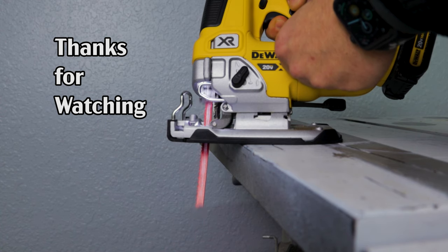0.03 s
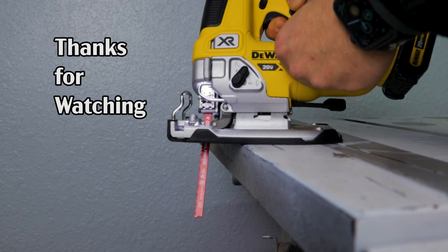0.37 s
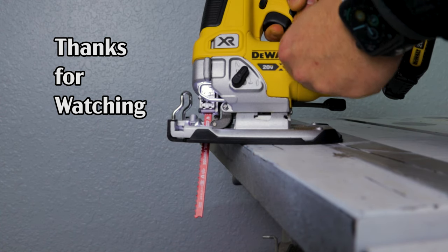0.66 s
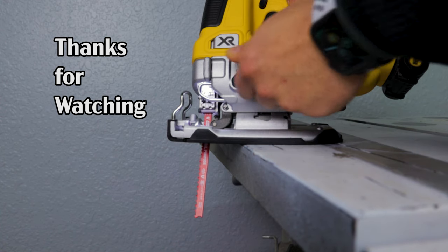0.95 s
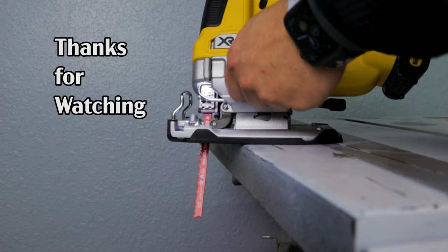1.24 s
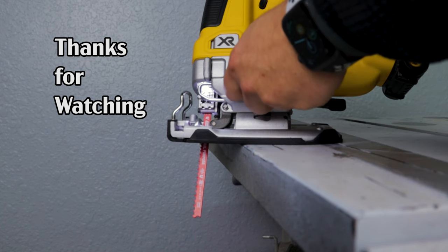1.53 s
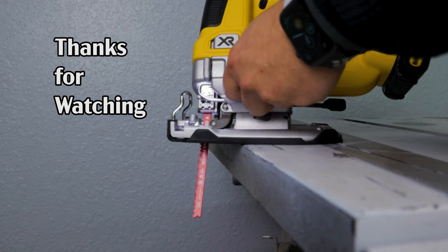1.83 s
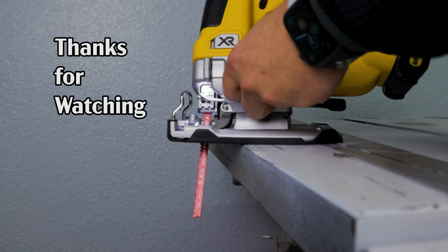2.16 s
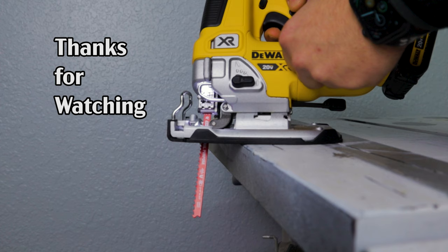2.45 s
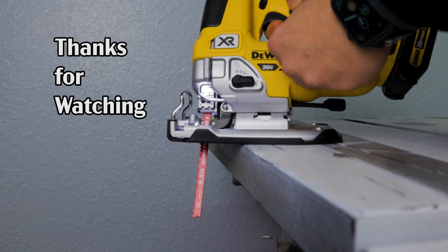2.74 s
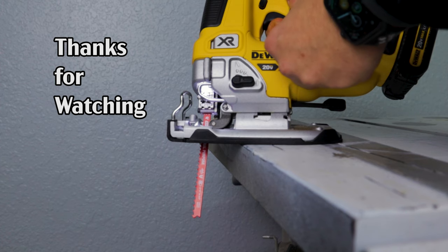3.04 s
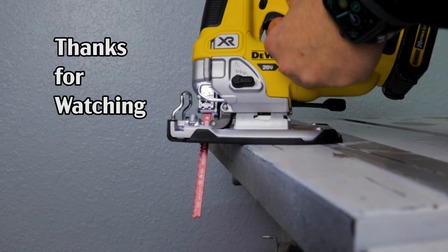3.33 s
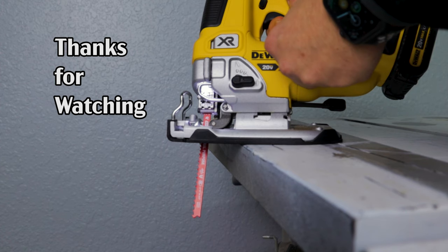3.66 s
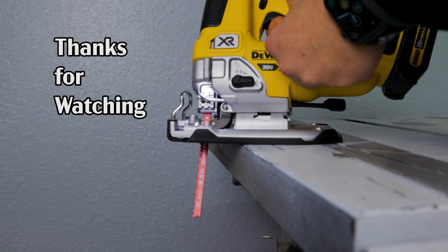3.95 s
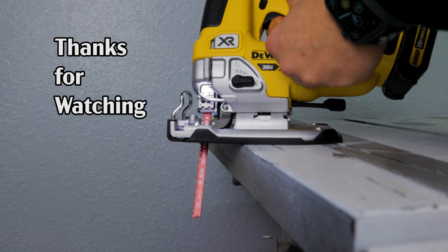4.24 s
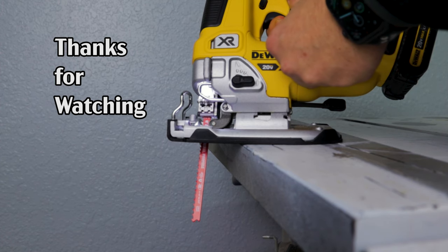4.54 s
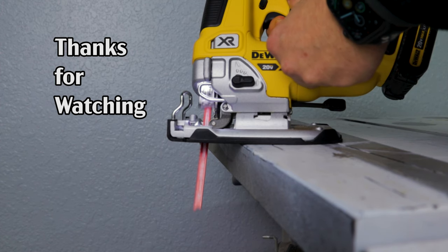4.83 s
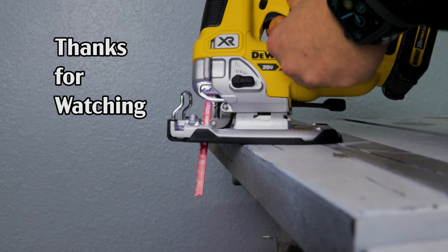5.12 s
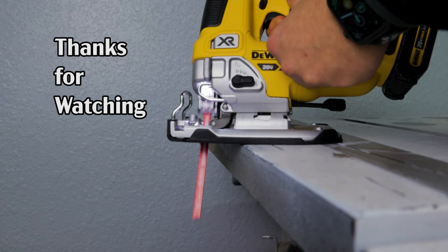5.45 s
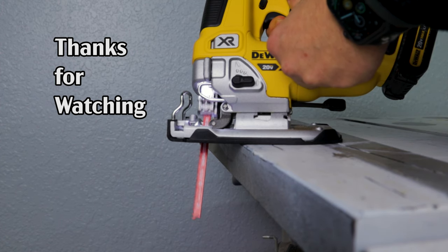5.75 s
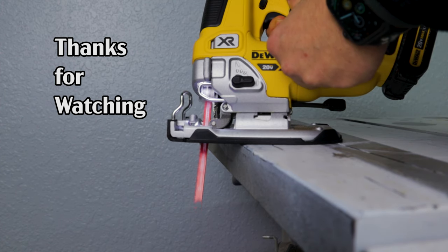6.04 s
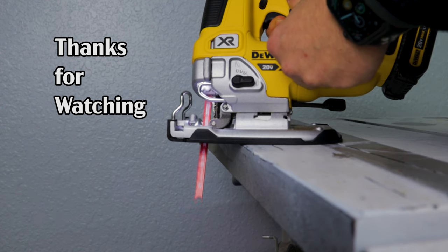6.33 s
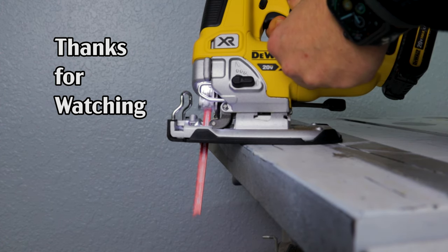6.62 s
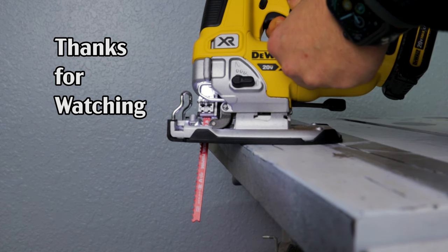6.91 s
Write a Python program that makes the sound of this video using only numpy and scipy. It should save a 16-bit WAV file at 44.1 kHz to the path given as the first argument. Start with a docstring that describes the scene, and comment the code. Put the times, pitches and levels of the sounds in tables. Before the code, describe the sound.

In a small room, close by and a little to the right, a jigsaw idles for a moment with a pulsing gear whine and metallic clacks, then stops. Over a low ventilation hum, a hand taps the plastic grip, snaps a lever into its notch and lightly clicks the trigger. The saw starts again at the same slow pace, its blade moving freely through the air, and finally brakes with a clunk.

```python
"""A cordless jigsaw idles slowly with its blade in the air, in a small room, a little to the right.
Its gears whirr and sag in speed on every stroke, and the blade shaft clacks at each end of its travel.
It brakes with a clunk, a hand flips the lever on its side and takes the grip again, the trigger
clicks and squeals faintly, and the saw runs once more and stops. Ventilation rumbles softly behind it."""
import sys
import numpy as np
from scipy import signal
from scipy.fft import rfft, irfft, next_fast_len
from scipy.io import wavfile

SR = 44100
rng = np.random.default_rng(int(sys.argv[2]) if len(sys.argv) > 2 else 0)


def waveform_to_disk(signal):
    """Save audio, clipped to [-1, 1], as 16-bit WAV at the path in sys.argv[1]."""
    frames = np.transpose(np.atleast_2d(signal))
    scaled = np.clip(frames, -1, 1) * 32767
    samples = np.round(scaled).astype(np.int16)
    wavfile.write(sys.argv[1], SR, samples)


N = 316726
TIME = np.arange(N) / SR
BINS = np.fft.rfftfreq(8192, 1 / SR)  # the frequencies in Hz at which filters are drawn


def gain_of(db):
    """Turns decibels into a factor to multiply by."""
    return 10 ** (np.asarray(db) / 20)

def evened(x):
    """Scales a signal to an average power of one."""
    return x / np.sqrt(np.mean(x ** 2) + 1e-20)

def read(points, hz, column=1):
    """Reads between the rows of a table, with frequency spaced in octaves."""
    points = np.asarray(points, float)
    return np.interp(np.log(hz + 1), np.log(points[:, 0] + 1), points[:, column])

def peaks_db(resonances, hz=BINS):
    """A curve in dB with a bump or dip for each resonance of a part."""
    return sum(db / (1 + (2 * (hz - centre) / width) ** 2) for centre, width, db in resonances)

def add(mix, start, sound):
    """Mixes a sound in at a start time in seconds."""
    part = mix[max(round(start * SR), 0):][:len(sound)]
    part += sound[:len(part)]

def colour(x, db):
    """Filters a sound so that it rings after each hit; only the shape of the dB curve counts."""
    log_gain = np.log(gain_of(np.r_[db, db[-2:0:-1]]))
    taps = np.fft.ifft(np.exp(np.conj(signal.hilbert(log_gain)))).real[:len(db)]
    return signal.oaconvolve(np.atleast_2d(x), taps[None] / np.linalg.norm(taps), axes=1)[:, :N]

def wander(rate_hz):
    """A smooth random wobble, about one in size."""
    coarse = TIME[::32]
    hz = np.fft.rfftfreq(len(coarse), coarse[1])
    slow = rfft(rng.standard_normal(len(coarse))) / (1 + (hz / rate_hz) ** 4)
    return np.interp(TIME, coarse, evened(irfft(slow, len(coarse))))

def burst(decay_s):
    """A brief chatter of contacts, equally strong from bass to treble."""
    t = TIME[:SR // 10]
    x = rng.standard_normal(len(t)) * (np.exp(-t / decay_s) - np.exp(-4 * t / decay_s))
    for _ in range(3):
        flat = irfft(np.exp(1j * np.angle(rfft(x))), len(t))
        x = flat * np.exp(-(t / (4 * decay_s)) ** 4)
    return x / np.linalg.norm(x)

def noise_pair(likeness):
    """Left and right white noise, as alike as a table says (1 the same, 0 unrelated, -1 opposite)."""
    left, other = rfft(rng.standard_normal((2, N)))
    alike = np.clip(read(likeness, np.fft.rfftfreq(N, 1 / SR)), -1, 1)
    return irfft(np.array([left, alike * left + np.sqrt(1 - alike ** 2) * other]), N)


# Trigger pulls. Each row: on and off in seconds, braking time in seconds, gear tone boost in dB.
RUNS = [(-1, .443, .058, -2), (4.62, 7.04, .04, 0)]
EFFORT_POWER = 1.4  # loudness follows the motor's speed raised to this power
def motor_speed(spin_up_s=.008):
    """Speed from 0 to 1: it leaps up with the trigger, holds, and dies away under the brake."""
    return sum(np.clip((TIME - on) / spin_up_s, 0, 1) * np.exp(-np.maximum(TIME - off, 0) / brake)
               for on, off, brake, _ in RUNS)

# The crank in each run. Each row: a time when the shaft is lowest, length of a turn, both in seconds.
CRANK_TURNS = [(.1265, .238), (4.7952, .2368)]
def crank_angle():
    """The crank turns evenly; its angle is zero when the shaft is lowest."""
    angle = np.zeros(N)
    for (on, *_), (lowest, turn) in zip(RUNS, CRANK_TURNS):
        angle = np.where(TIME >= on, 2 * np.pi * (TIME - lowest) / turn, angle)
    return angle

# Gear tones. Each row: multiple of the tooth rate, level in dB, swell in dB, loudest point of the turn.
GEAR_TONES = [(2, -55, 5, .56), (3, -54, 4, .95), (4, -52, 12.5, .27), (5, -58, 6, .65), (6, -55, 4, .1),
              (7, -56, 7, .72), (8, -56, 7.5, .73), (9, -62.5, 3, .3), (10, -67, 6, .25)]
# The housing's resonances. Each row: frequency in Hz, width in Hz, boost or cut in dB.
HOUSING = [(344, 17, 11.5), (436, 18, 4), (528, 40, 5), (851, 30, 7), (1008, 47, 6), (1111, 40, 3),
           (1243, 82, -4.5), (1450, 70, 4), (2030, 30, -3), (2095, 60, 4), (2490, 70, 6), (3560, 450, 6),
           (3690, 140, 5.5), (4080, 220, -4), (4490, 110, 4), (4740, 110, 3), (7570, 480, 7.5),
           (11040, 340, 5.5)]
def gear_whine(teeth, tooth_hz, angle, flutter_db=1.2, focus=1.8):
    """Meshing teeth sing; each tone swells once a turn and whenever it crosses a resonance."""
    whine, housing_db = np.zeros(N), peaks_db(HOUSING)
    for multiple, db, swell_db, loudest in GEAR_TONES:
        swell = np.exp(focus * (np.cos(angle - 2 * np.pi * loudest) - 1))
        level_db = db + swell_db * swell + np.interp(multiple * tooth_hz, BINS, housing_db)
        level_db += flutter_db * wander(51)
        whine += gain_of(level_db) * np.sin(2 * np.pi * (multiple * teeth + rng.random()))
    return whine * gain_of(sum(db * (TIME >= on) * (TIME < off + 1) for on, off, _, db in RUNS))

# The motor's fine whine. Each row: multiple of its turning rate, level in dB.
MOTOR_TONES = [(10, -61), (15, -59), (19, -65), (24, -72), (26, -61.5), (28, -61.5), (30, -63), (31, -60.5),
               (32, -57), (33, -63), (35, -68), (38, -66), (42, -66)]
def motor_whine(teeth, tooth_hz, turns_per_tooth=.4566, flutter_db=2, boost_db=.4):
    """The motor's close-set tones sway with each stroke and grow as they cross a resonance."""
    whine, housing_db = np.zeros(N), peaks_db(HOUSING)
    for harmonic in range(10, 43):
        multiple = harmonic * turns_per_tooth
        level_db = np.interp(harmonic, *np.transpose(MOTOR_TONES)) + boost_db
        level_db += np.interp(multiple * tooth_hz, BINS, housing_db) + flutter_db * wander(25)
        whine += gain_of(level_db) * np.sin(2 * np.pi * (multiple * teeth + rng.random()))
    return whine

# The gearbox's tone colour. Each row: frequency in Hz, level in dB.
GEARBOX_COLOUR = [(20, -50), (60, -31), (150, -10.5), (270, -7.5), (360, -7), (520, -0.5), (660, .5),
                  (1000, 0), (1300, -4.5), (1800, -0.5), (2900, -13.3), (4800, -12), (6200, -19.5),
                  (8000, -21), (11500, -32), (13500, -48), (16000, -57)]
# The saw's noise in stereo. Each row: frequency in Hz, how alike left and right are.
SAW_LIKENESS = [(300, 1), (1000, 0.86), (2000, .75), (4000, 0.49), (12000, .55)]
def gear_grind(teeth, speed, ease, rattle=.28, scatter_db=2, ease_db=-.02, dull_hz=1500):
    """Every tooth lands with its own force and scrapes for a moment."""
    force = gain_of(scatter_db * np.clip(rng.standard_normal(N), -2, 2))[teeth.astype(int)]
    scrape = rattle * evened(force * np.exp(-(teeth % 1) / .25)) + (1 - rattle)
    level = evened(scrape) * speed ** EFFORT_POWER * gain_of(ease_db * ease)
    grind = colour(level * noise_pair(SAW_LIKENESS), read(GEARBOX_COLOUR, BINS) + peaks_db(HOUSING))
    dull = signal.lfilter(*signal.butter(1, dull_hz, fs=SR), grind)
    return dull + speed * (grind - dull)  # slower teeth land more softly and lose their treble

# The sliding shaft's tone colour. Each row: frequency in Hz, level in dB.
SLIDE_COLOUR = [(5000, -32), (8500, -9), (11000, 7), (13000, -15), (16000, -40)]
def shaft_hiss(angle):
    """The shaft hisses in its guide where it moves fastest."""
    return colour(noise_pair(SAW_LIKENESS), read(SLIDE_COLOUR, BINS)) * np.abs(np.sin(angle + .15)) ** 4

def whirr(mesh_hz=270, sag=.057, lag_rad=.11, lift_sag=.018, waver=.002, grind_db=-40.3, hiss_db=-62):
    """Gears, motor and shaft together: they slow in mid-stroke, most of all while lifting the shaft."""
    speed, angle = motor_speed(), crank_angle()
    ease = np.cos(2 * (angle - lag_rad))  # high at the ends of a stroke, low in the middle
    tooth_hz = mesh_hz * speed * (1 + sag * ease - lift_sag * np.sin(angle) + waver * wander(25))
    teeth = np.cumsum(tooth_hz) / SR  # how many teeth have met so far
    whine = gear_whine(teeth, tooth_hz, angle) + speed * motor_whine(teeth, tooth_hz)
    grind = gain_of(grind_db) * gear_grind(teeth, speed, ease)
    hiss = gain_of(hiss_db) * speed * shaft_hiss(angle)
    return speed ** EFFORT_POWER * (whine + hiss) + grind

# The loaded crank pin's tone colour. Each row: frequency in Hz, level in dB.
CHUG_COLOUR = [(20, -65), (100, -39), (300, -18.5), (430, -3), (540, 1.5), (720, -4.5), (1000, -15),
               (3000, -51)]
def chug(level_db=-41.8, lag_rad=.41):
    """Just after the shaft turns round, the crank pin takes up the load and the housing throbs."""
    load = gain_of(level_db) * motor_speed() ** EFFORT_POWER * np.abs(np.cos(crank_angle() - lag_rad)) ** 10
    return colour(noise_pair(SAW_LIKENESS) * load, read(CHUG_COLOUR, BINS) + peaks_db(HOUSING))

# The shaft turns round. Each row: start in seconds, clink level in dB, knock level in dB.
STROKES = [(0.0084, -28, -33), (0.1271, -23.5, -29), (0.2468, -28, -35), (0.3641, -22, -34),
           (4.6783, -30, -34), (4.795, -23, -30), (4.9152, -24, -31), (5.032, -22, -28), (5.1522, -26, -33),
           (5.2689, -22, -31), (5.3892, -26, -36), (5.5059, -21, -28), (5.6261, -29, -33),
           (5.7428, -21, -32), (5.8631, -29, -35), (5.9798, -22, -32), (6.0995, -26, -33),
           (6.2163, -24, -29), (6.3365, -26, -33), (6.4532, -23, -31), (6.573, -28, -34),
           (6.6897, -24, -30), (6.8099, -26, -32), (6.9267, -24, -30)]
# The shaft's ring. Each row: pitch in Hz, seconds to fade 60 dB, dB at the upper end, dB at the lower.
SHAFT_RING = [(344, .4, -25, -22), (436, .28, -22, -12), (490, .18, -22, -10), (535, .16, -4, -11.5),
              (706, .12, -18, -10), (1440, .07, -13.5, -12.5), (1670, .045, 2.5, -6), (1760, .07, -22, -5)]
# The blade clamp's resonances. Each row: frequency and width in Hz, dB at the upper end, dB at the lower.
CLAMP = [(4700, 560, 8.5, -2), (5500, 450, -3, .5), (6400, 550, -2.5, 5), (7350, 600, 5, 3)]
# Tone colours of the knock and the clink. Each row: frequency in Hz, level in dB.
KNOCK_COLOUR = [(20, -60), (60, -43), (250, -19), (450, -13), (730, 3.5), (1200, -3.5), (1800, 2.5),
                (2800, -10.5), (4500, -17), (8000, -24), (16000, -48)]
CLINK_COLOUR = [(1500, -15.5), (3500, -13.5), (4700, -3), (6300, -1.5), (8000, -4.5), (9500, -8),
                (11500, -7), (14000, -23), (16000, -37)]
def clacks(knock_db=21, ring_db=-1, clink_db=(15, 13.3), knock_lead_s=.0009, clink_lag_s=.0011,
           chatter=.72, build_cycles=2.5):
    """At each end of a stroke the shaft's loose link knocks, the shaft rings and the clamp clinks."""
    knocks, rings, clinks = np.zeros(N), np.zeros(N), np.zeros((2, 2, N))
    t, is_low = TIME[:SR // 5], np.cos(crank_angle()) > 0
    for start, high_db, low_db in STROKES:
        end = int(is_low[round(start * SR)])  # 0 for the upper end, 1 for the lower
        blow = chatter * burst(decay_s=.003)
        blow[0] += 1 - chatter  # one firm contact, then chatter
        add(knocks, start - knock_lead_s, gain_of(low_db + knock_db) * blow / np.linalg.norm(blow))
        for side in clinks[end]:  # the clamp scatters its treble differently to each side
            add(side, start + clink_lag_s, gain_of(high_db + clink_db[end]) * burst(decay_s=.0013))
        for hz, fade_s, *ends_db in SHAFT_RING:
            fade = gain_of(low_db + ring_db + ends_db[end] - 60 * t / fade_s)
            rise = 1 - np.exp(-t * hz / build_cycles)
            add(rings, start, rise * fade * np.sin(2 * np.pi * hz * rng.uniform(.98, 1.01) * t))
    out = colour(knocks, read(KNOCK_COLOUR, BINS) + peaks_db(HOUSING)) + rings
    for end, clink in enumerate(clinks):
        clamp = [(hz, width, ends_db[end]) for hz, width, *ends_db in CLAMP]
        out = out + colour(clink, read(CLINK_COLOUR, BINS) + peaks_db(clamp))
    return out

# The background's tone colour, then its faint whine. Each row: frequency in Hz, level in dB.
RUMBLE_COLOUR = [(20, -18), (45, -19.5), (75, -8.5), (113, -13.5), (190, -14.5), (330, -19), (740, -22),
                 (1000, -26), (2300, -29.5), (3300, -34), (6000, -42), (11500, -48.5), (12800, -58.5),
                 (16000, -73)]
ROOM_WHINE = [(2700, -93), (3270, -97)]
# The background in stereo. Each row: frequency in Hz, how alike left and right are.
RUMBLE_LIKENESS = [(60, 1), (180, .75), (550, -0.47), (1650, -0.44), (5000, -0.58), (15000, -0.73)]
def room_tone(level_db=-59, drone_hz=87, drone_width_hz=14, drone_db=6.5, waver=.004):
    """Low ventilation rumble with a soft drone, under a thin hiss and a faint steady whine."""
    hz = np.fft.rfftfreq(N, 1 / SR)
    shape = gain_of(read(RUMBLE_COLOUR, hz) + peaks_db([(drone_hz, drone_width_hz, drone_db)], hz))
    whine = np.zeros(N)
    for pitch, db in ROOM_WHINE:
        cycles = np.cumsum(pitch * (1 + waver * wander(15))) / SR
        whine += gain_of(db) * np.sqrt(2) * np.sin(2 * np.pi * cycles)
    return gain_of(level_db) * evened(irfft(rfft(noise_pair(RUMBLE_LIKENESS)) * shape, N)) + whine

# The coasting fan's tone colour. Each row: frequency in Hz, level in dB.
FAN_COLOUR = [(800, -12), (1700, 0), (3300, -7), (6000, -12), (9000, -18), (11800, -17), (13500, -32)]
def coasting_fan(level_db=-63, fade_s=.23):
    """After the trigger is let go, the air through the cooling fan dies away as a thin hiss."""
    fade = sum((TIME > off) * np.exp(-np.maximum(TIME - off, 0) / fade_s) for _, off, *_ in RUNS)
    return gain_of(level_db) * fade * colour(noise_pair(SAW_LIKENESS), read(FAN_COLOUR, BINS))

# The four bands of a click. Each row: lower edge in Hz, upper edge in Hz, fade time in seconds.
CLICK_BANDS = [(377, 880, 0.013), (900, 2580, 0.005), (2710, 8450, 0.0012), (8300, 12300, 0.00041)]
def clicks(events, part, bands_db, stretch, boost_db=23):
    """Short blows ring the struck part; low bands last longest, and stretch scales every fade time."""
    out = np.zeros(N)
    for start, db, bright_db in events:
        for k, (low_hz, high_hz, decay_s) in enumerate(CLICK_BANDS):
            band_filter = signal.butter(3, [low_hz, high_hz], "band", fs=SR, output="sos")
            band = colour(signal.sosfilt(band_filter, burst(decay_s * stretch)), peaks_db(part))[0]
            level_db = boost_db + db + bands_db[k] + bright_db * (k - 1)
            add(out, start, gain_of(level_db) * band / np.linalg.norm(band))
    return out

# Braking clunks. Each row: start in seconds, level in dB, brightness in dB per band.
CLUNKS = [(.4485, -34.5, 2), (.570, -40, -5), (7.037, -27, 3), (7.089, -36.5, -2.5)]
# The gear case's resonances. Each row: frequency in Hz, width in Hz, boost or cut in dB.
GEAR_CASE = [(430, 200, -8), (550, 50, 5), (750, 70, 6), (870, 80, 6), (1170, 130, 3), (1530, 110, -7),
             (1700, 110, 8), (1870, 70, -6), (2020, 110, 9), (2450, 110, 4), (3280, 250, 4), (4700, 600, 4)]
def brake_clunks():
    """The gears slam through their slack as the saw brakes."""
    return clicks(CLUNKS, GEAR_CASE, bands_db=(-8.5, 0, -13, -30), stretch=.7)

# Jolts of the body. Each row: start in seconds, level in dB, brightness in dB per band.
THUMPS = [(.449, -38, 0), (1.365, -51, -1), (4.625, -46, -1), (7.046, -37, -3)]
# The grip's resonances. Each row: frequency in Hz, width in Hz, boost or cut in dB.
GRIP = [(470, 80, 13), (1630, 130, 8), (2000, 260, 9), (4600, 600, 5)]
def body_thumps():
    """The whole body jolts as the motor brakes or starts, or the hand lands on it."""
    return clicks(THUMPS, GRIP, bands_db=(0, -14, -19, -27), stretch=1.1)

# Finger taps. Each row: start in seconds, level in dB, brightness in dB per band.
TAPS = [(.779, -55, 1), (.813, -61, 0), (1.901, -64, -1), (2.359, -58.5, 1), (2.777, -62.5, 0)]
def finger_taps():
    """Fingers tap the plastic grip."""
    return clicks(TAPS, GRIP, bands_db=(-7, 0, -13, -36), stretch=1.3)

def fade_in_out(start, end, edge_s=.1):
    """Fades in, holds, and fades out."""
    return np.clip(np.minimum(TIME - start, end - TIME) / edge_s, 0, 1)

# Slow rubs. Each row: start in seconds, end in seconds, level in dB.
RUBS = [(1.69, 1.95, -75), (3.82, 4.56, -74)]
# Their tone colour. Each row: frequency in Hz, level in dB.
RUB_COLOUR = [(300, -30), (1000, -15), (1850, -11), (2070, 0), (2220, 0), (2450, -11), (3300, -12),
              (5000, -21), (12000, -30), (16000, -55)]
def rubbing(uneven_db=2):
    """Friction sounds the plastic shell as fingers rub it and as the trigger slides slowly in."""
    level = sum(gain_of(db) * fade_in_out(start, end) for start, end, db in RUBS)
    friction = noise_pair(SAW_LIKENESS) * level * gain_of(uneven_db * wander(30))
    return colour(friction, read(RUB_COLOUR, BINS))

# The lever's snap. Each row: start in seconds, level in dB, brightness in dB per band.
LEVER_SNAP = [(2.1614, -35.5, 0)]
# Its notch's resonances. Each row: frequency in Hz, width in Hz, boost or cut in dB.
NOTCH = [(450, 60, 5), (550, 70, 8), (620, 50, -7), (790, 130, 6), (1300, 250, -5), (2350, 250, -5),
         (3350, 1100, 8), (6800, 1800, -4), (9500, 700, 5), (10700, 1400, 10)]
def lever_snap():
    """The side lever snaps into its notch."""
    return clicks(LEVER_SNAP, NOTCH, bands_db=(-14, -13.5, -7.5, -.5), stretch=.75)

# Trigger clicks. Each row: start in seconds, level in dB, brightness in dB per band.
TRIGGER_CLICKS = [(2.3293, -56, -2), (3.03, -59, -1), (3.123, -76, 4), (3.416, -78, 2), (3.7628, -47, 3),
                  (4.5961, -52.5, -.5)]
# The trigger's resonances. Each row: frequency in Hz, width in Hz, boost or cut in dB.
TRIGGER = [(1750, 220, 8), (2260, 160, 7), (2750, 140, 4), (2980, 200, -6), (3320, 300, 9), (4650, 800, 9),
           (6300, 1500, -4), (8650, 1200, 5.5), (10400, 1500, 4)]
def trigger_clicks():
    """The trigger and its lock click."""
    return clicks(TRIGGER_CLICKS, TRIGGER, bands_db=(-5, 0, 1, -9), stretch=1.1)

# The squeal's path. Each row: time in seconds, pitch in Hz.
SQUEAL = [(3.9, 11500), (3.985, 12650), (4.035, 11500), (4.14, 13500), (4.24, 11700), (4.32, 13100),
          (4.39, 12300), (4.48, 12500)]
def trigger_squeal(level_db=-95, waver=.003):
    """A thin squeal warbles while the trigger is half pressed."""
    hz = np.interp(TIME, *np.transpose(SQUEAL)) * (1 + waver * wander(200))
    level = gain_of(level_db) * fade_in_out(SQUEAL[0][0], SQUEAL[-1][0])
    return level * np.sin(2 * np.pi * np.cumsum(hz) / SR)

# The room's echo tail. Each row: frequency in Hz, seconds to fade 60 dB, level in dB.
ROOM_TAIL = [(200, .36, -11.5), (600, 0.45, -7), (2000, 0.51, -7.5), (5000, 0.38, -8), (12200, 0.25, -9.5)]
# The right side is earlier. Each row: frequency in Hz, head start in radians.
RIGHT_LEAD = [(100, 0.052), (500, 0), (1000, .35), (2000, .8), (4000, 1.67), (8000, 1.86), (14000, 0.44)]
# The right side is mostly louder. Each row: frequency in Hz, extra level in dB.
RIGHT_BOOST = [(120, -0.5), (350, 3.5), (550, -0.5), (1000, 4.5), (2200, 4.5), (3000, 2), (5000, 0.5),
               (8000, 1.4)]
def room(sound, to_tail, wall_s=.0074, wall_db=-11.5):
    """Direct sound reaches the right side first, then come an echo off the wall and a short tail."""
    size = SR // 2
    echoes = rng.choice([-1., 1.], (2, size)) * (rng.random((2, size)) < .15) * (TIME[:size] > .002)
    hz, t, spectrum = signal.stft(echoes, SR, nperseg=256)
    fade = gain_of(-60 * t / read(ROOM_TAIL, hz)[:, None])
    fade *= gain_of(read(ROOM_TAIL, hz, column=2))[:, None] / np.sqrt(np.mean(fade ** 2, 1))[:, None]
    tail = signal.istft(spectrum * fade, SR, nperseg=256)[1] / np.linalg.norm(echoes[0])
    length = next_fast_len(N + SR)
    hz = np.fft.rfftfreq(length, 1 / SR)
    # the wall's echo is mostly treble: the saw's body shades the rest
    wall = gain_of(wall_db) * hz / (hz + 1500) * np.exp(-2j * np.pi * hz * wall_s)
    direct = np.array([np.exp(-1j * read(RIGHT_LEAD, hz)), np.ones(len(hz))])
    early = rfft(sound, length) * direct * (1 + wall)
    late = rfft(to_tail, length) * rfft(tail, length)
    balance = gain_of(np.outer([-.5, .5], read(RIGHT_BOOST, hz)))
    return irfft((early + late) * balance, length)[:, :N]

def scene(trigger_tail_db=-3.5):
    """The saw in its room; the trigger's clicks sound close and dry, with less room tail."""
    jolts = brake_clunks() + body_thumps()
    handling = lever_snap() + finger_taps() + rubbing() + trigger_squeal()
    saw = whirr() + chug() + clacks() + coasting_fan() + jolts + handling
    trigger = trigger_clicks()
    return room(saw + trigger, saw + gain_of(trigger_tail_db) * trigger) + room_tone()

def record(dry, top_hz=16100):
    """Cuts off the very highest treble."""
    return signal.oaconvolve(dry, signal.firwin(511, top_hz, window=("kaiser", 9), fs=SR)[None], "same")


dry = scene()
out = record(dry)
waveform_to_disk(out)
```